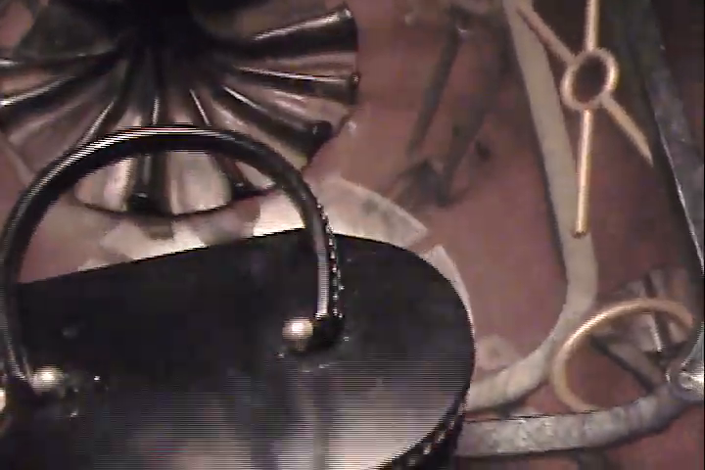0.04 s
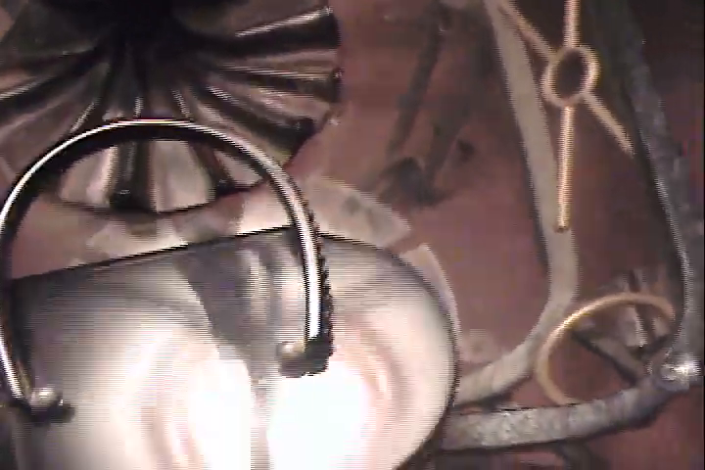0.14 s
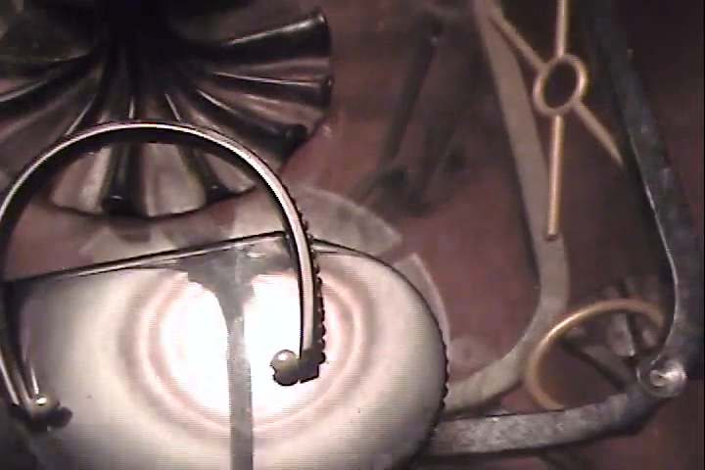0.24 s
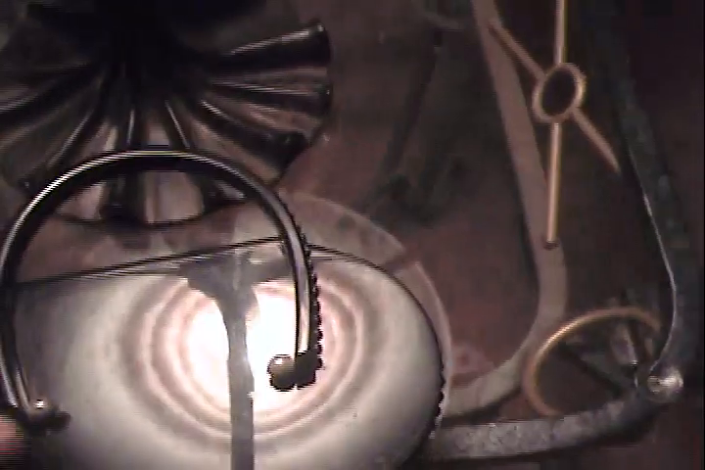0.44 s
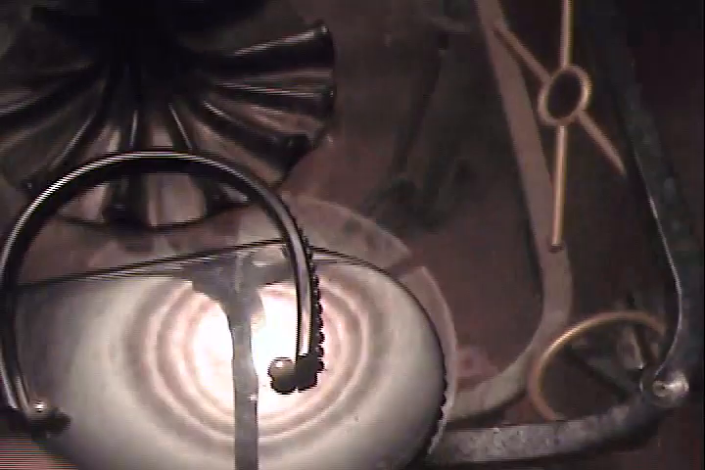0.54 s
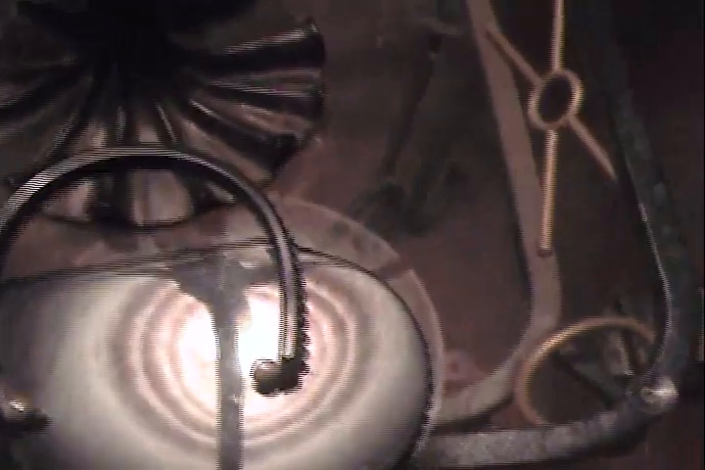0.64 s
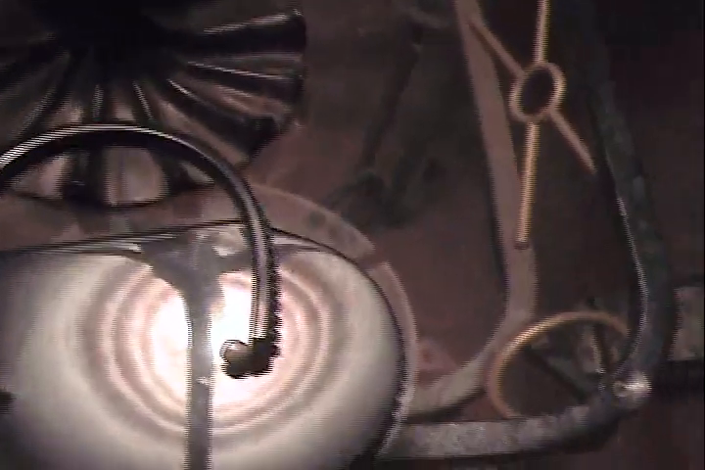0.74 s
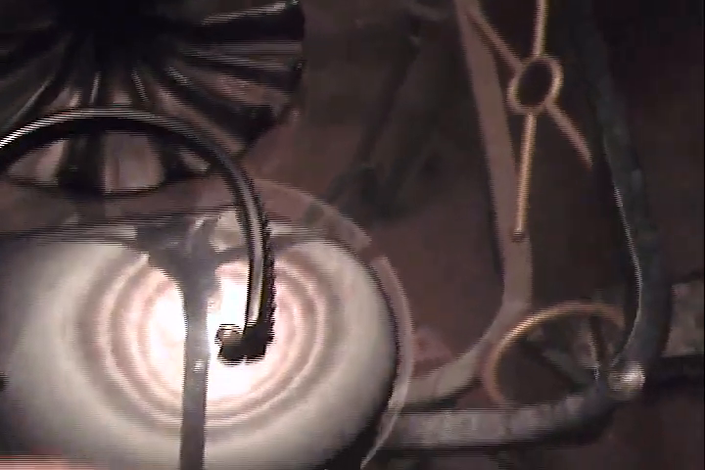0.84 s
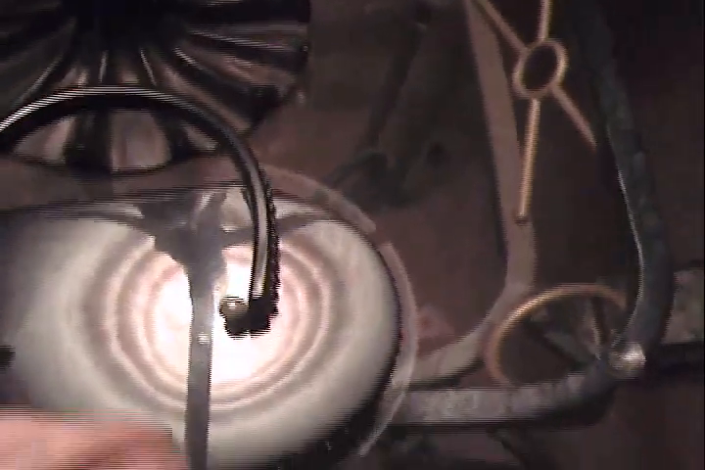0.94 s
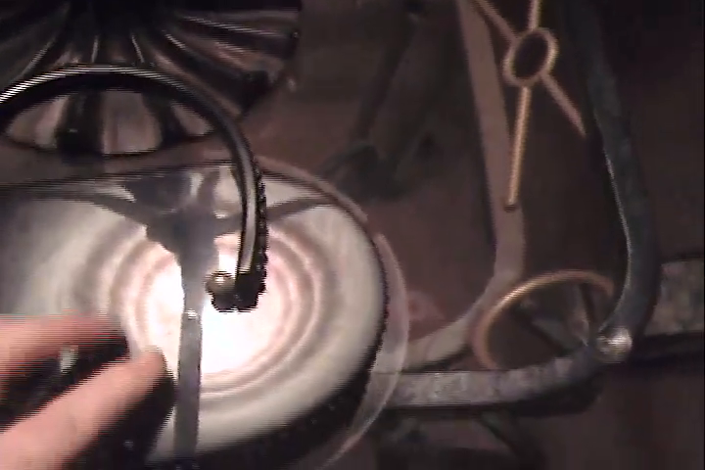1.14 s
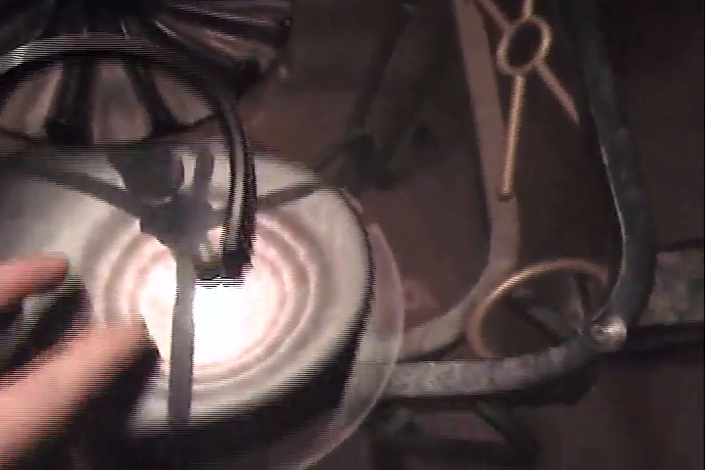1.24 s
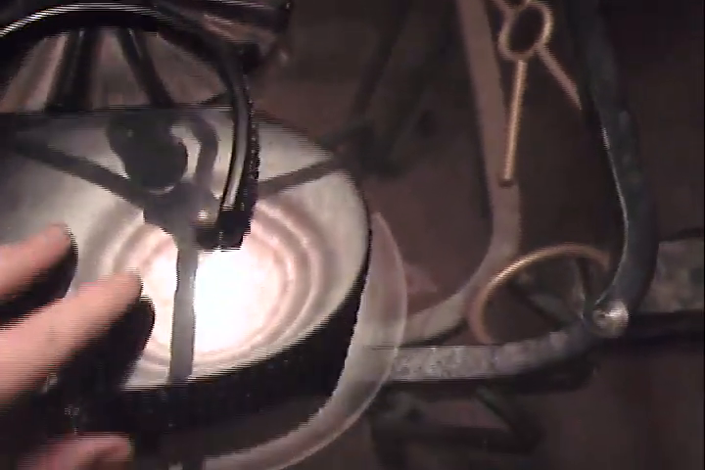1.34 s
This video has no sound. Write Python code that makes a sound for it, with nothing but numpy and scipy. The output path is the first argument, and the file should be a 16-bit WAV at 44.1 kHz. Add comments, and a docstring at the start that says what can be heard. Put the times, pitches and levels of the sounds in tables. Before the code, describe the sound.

A purse clasp snaps twice, then the hard case knocks on a table.

```python
"""In a small room, a hard-shelled purse is handled close to the microphone.
Its clasp snaps twice, the case knocks on the table, and fingers brush and tap it.
Each impact excites damped normal modes of the hollow case, and the hard ones ring the clasp too.
The room answers with a short reverberant tail and a low boom over a faint rumble."""
import sys
import numpy as np
from scipy import signal
from scipy.fft import rfft, irfft
from scipy.io import wavfile

SR = 44100
rng = np.random.default_rng(int(sys.argv[2]) if len(sys.argv) > 2 else 0)


def store_wav(level_fs):
    """Save 16-bit WAV to argv[1]."""
    pcm = np.round(np.clip(np.atleast_2d(level_fs), -1, 1) * 32767)
    wavfile.write(sys.argv[1], SR, pcm.T.astype(np.int16))


N = 61739


def from_db(db):
    """Amplitude ratio: a factor of ten for every 20 dB."""
    return 10 ** (np.asarray(db) / 20)


def at_hz(points, hz):
    """Interpolation on a logarithmic frequency axis."""
    frequencies, values = np.transpose(points)
    return np.interp(np.log(hz), np.log(frequencies), values)


def envelope(points):
    """Exponential growth and decay between (time_s, level_db) points; the end levels hold."""
    return from_db(np.interp(np.arange(N) / SR, *np.transpose(points)))


def impulses(times_s, levels_db):
    """Impulsive force: each impact lasts one sample."""
    force = np.zeros(N)
    np.add.at(force, (np.asarray(times_s) * SR).astype(int), from_db(levels_db))
    return force


def ring(force, modes, alternate=True):
    """Modal superposition: force convolved with damped sines, by default of alternating sign."""
    t = np.arange(N) / SR
    response = 0
    for k, (hz, db, t60) in enumerate(modes):
        sign = (-1) ** k if alternate else 1
        response += sign * from_db(db - 60 * t / t60) * np.sin(2 * np.pi * hz * t)
    return signal.fftconvolve(force, response)[:N]


def noise(spectrum, coherence, size=N, tilt_db=0):
    """Partially coherent stereo noise, of unit rms before a tilt per octave about 2 kHz."""
    hz = np.maximum(np.arange(size // 2 + 1) * SR / size, 1)
    gain = from_db(at_hz(spectrum, hz))
    gain /= np.sqrt(np.mean(gain ** 2))
    alike = at_hz(coherence, hz)
    octaves = np.log2(np.maximum(hz, 500) / 2000)
    mid, side = rfft(rng.standard_normal((2, size)))
    pair = np.sqrt((1 + alike) / 2) * mid + np.sqrt((1 - alike) / 2) * side * [[1], [-1]]
    return irfft(pair * gain * from_db(tilt_db * octaves), size)


def add(out, start_s, sound):
    """Linear superposition of a delayed sound."""
    i = int(start_s * SR)
    out[:, i:i + sound.shape[1]] += sound[:, :N - i]


# background spectrum: frequency_hz, density_db
RUMBLE_SPECTRUM = [(20, -7.5), (40, 0.5), (80, 2.5), (130, -9.5), (220, -9.5), (400, -17), (700, -20),
                   (1300, -30.5), (3000, -47.5), (6000, -42), (10500, -40), (12500, -76)]
# left-right likeness of rumble and brushing: frequency_hz, coherence
DIFFUSE_COHERENCE = [(30, 0.91), (200, 0.95), (1000, 0.77), (3000, 0.41), (5500, 0.22), (9000, 0.21)]
def room_rumble():
    """Ambient noise: a steady low rumble, most coherent at long wavelengths."""
    return from_db(-41) * noise(RUMBLE_SPECTRUM, DIFFUSE_COHERENCE)


# strength of the rubbing: time_s, level_db
BRUSH_LEVELS = [(0.70, -54.5), (0.77, -55), (0.82, -57.5), (0.95, -52), (1.03, -55.5), (1.17, -55.5),
                (1.24, -47), (1.31, -55), (1.39, -55)]
# friction spectrum: frequency_hz, density_db
BRUSH_SPECTRUM = [(300, -20), (1500, 3), (3500, 2.5), (6000, -3.5), (10000, -9), (12500, -28)]
def finger_brush():
    """Sliding friction: fingers on the shell make a faint hiss throughout, with late swells."""
    return envelope(BRUSH_LEVELS) * noise(BRUSH_SPECTRUM, DIFFUSE_COHERENCE)


# fingertips, or the case bouncing on the table: start_s, level_db, cutoff_hz
SOFT_TAPS = [(0.0790, -40, 900), (0.2551, -11, 1200), (0.2656, -21, 1100), (1.2456, -15.5, 322),
             (1.3767, -17.5, 1200)]
def soft_taps():
    """Compliant impact: a soft contact low-passes the case's ring, its crack and the room's tail."""
    out = np.zeros((2, N))
    for start_s, level_db, cutoff_hz in SOFT_TAPS:
        knock = case(impulses([start_s], [level_db])) * np.ones((2, 1))
        add(knock, start_s, from_db(level_db - 9) * crack())
        add(knock, start_s, from_db(level_db - 1.5) * room_tail())
        softness = signal.butter(2, cutoff_hz, fs=SR, output="sos")
        out += signal.sosfilt(softness, knock + 1e-18)
    return out


# modes of the hard shell: pitch_hz, level_db, t60_s
SHELL_MODES = [(1340, -9.5, 0.0072), (1611, -12.5, 0.041), (3260, -15, 0.028), (3670, -22.5, 0.042),
               (4370, -14, 0.022), (4870, -24, 0.019), (5260, -14.5, 0.014)]
# modes of the hollow, starting in phase: pitch_hz, level_db, t60_s
CAVITY_MODES = [(237.7, -12, 0.19), (277.6, -6.5, .09), (329.6, -23, 0.11), (448, -24, 0.17),
                (545, -25.5, 0.092), (880, -33.5, 0.034)]
def case(force):
    """Shell and cavity resonance: a clack and a thump; so small a radiator gives little bass."""
    low_cut = signal.butter(3, 218, "high", fs=SR, output="sos")
    thump = signal.sosfilt(low_cut, ring(force, CAVITY_MODES, alternate=False))
    return ring(force, SHELL_MODES) + thump


# spectrum of the impact transient: frequency_hz, density_db
CRACK_SPECTRUM = [(130, -41), (300, -10), (620, 8.5), (900, -9.5), (1350, 6.5), (2000, -0.5), (4000, 4),
                  (6000, -5), (10000, -2), (12000, -21), (16000, -28)]
# left-right likeness of an impact and its tail: frequency_hz, coherence
IMPACT_COHERENCE = [(30, 0.99), (200, 1), (1500, .98), (3000, 0.95), (5500, 0.68), (9000, 0.2)]
def crack(tilt_db=0, t60_s=0.0096, size=2048):
    """Impact transient: hard surfaces meet in a dense rattle that decays exponentially."""
    t = np.arange(size) / SR
    return noise(CRACK_SPECTRUM, IMPACT_COHERENCE, size, tilt_db) * from_db(-60 * t / t60_s)


# spectrum of the reverberant field: frequency_hz, density_db
TAIL_SPECTRUM = [(60, 4.5), (130, -2), (250, -0.5), (600, 2.5), (950, -2), (1400, 1), (2700, -5),
                 (4500, -9), (7000, -16), (10500, -23.5), (13000, -68)]
# reverberation time: frequency_hz, t60_s
REVERB_TIMES = [(60, 0.75), (250, 0.46), (600, 0.26), (1500, 0.2), (4000, 0.29), (10000, 0.25)]
def room_tail(tilt_db=0, build_cycles=1.56, size=32768):
    """Reverberation: each octave decays at its own rate, and the lows build up later than the highs."""
    t = np.arange(size) / SR
    hz = np.maximum(np.arange(size // 2 + 1) * SR / size, 1)
    spectrum = rfft(noise(TAIL_SPECTRUM, IMPACT_COHERENCE, size, tilt_db))
    out = 0
    for centre_hz in 31.25 * 2 ** np.arange(10):
        band = np.maximum(1 - abs(np.log2(hz / centre_hz)), 0)
        build = 1 - np.exp(-t * centre_hz / build_cycles)
        decay = from_db(-60 * t / at_hz(REVERB_TIMES, centre_hz))
        out += irfft(spectrum * band, size) * build * decay
    return out * from_db(-19)


# pulses of the rocking case: time_s, rms_db
ROCKING_LEVELS = [(0.235, -65), (0.26, -37), (0.29, -61), (0.325, -26), (0.355, -55), (0.40, -30),
                  (0.44, -56.5)]
def case_rocking(pitch_hz=61.9):
    """Amplitude modulation: a dull low tone pulses as the case rocks after the first snap."""
    return np.sqrt(2) * envelope(ROCKING_LEVELS) * np.sin(2 * np.pi * pitch_hz * np.arange(N) / SR)


# modes of the clasp: pitch_hz, level_db, t60_s
CLASP_MODES = [(580, -28, 0.028), (1320, -11, 0.023), (1560, -16, 0.013), (2010, -14, 0.018),
               (2200, -14, .018), (2537, -12.5, 0.02), (2727, -12.5, 0.032), (2930, -11.5, 0.019),
               (3238, -11.5, 0.033), (3857, -12.5, 0.022), (4150, -11, 0.013), (4840, -26, 0.027),
               (5800, -25.5, 0.0057), (6350, -17, 0.018), (7800, -19, 0.0027), (9770, -29, 0.02)]
def clasp(force):
    """Free vibration: the struck clasp rings in bright, quickly damped modes."""
    return ring(force, CLASP_MODES)


# resonances of the room: pitch_hz, level_db, t60_s
ROOM_MODES = [(255, -22, 0.19), (357.5, -37.5, 1.09), (438.4, -37, 0.46), (482, -50, 0.5),
              (556, -27.5, 0.19), (652, -27.5, .27), (1136, -39, 0.3), (1430, -29.5, 0.12),
              (1560, -44, 0.51), (1858, -38, 0.16), (2670, -43, 0.05)]
def room_resonance(times_s, levels_db, delay_s=0.0054):
    """Standing waves: the room's modes ring a moment after each hard contact."""
    return ring(impulses(times_s + delay_s, levels_db), ROOM_MODES)


# snaps and knocks: start_s, clasp_db, case_db, crack_db, tilt_db_per_octave, room_db
HARD_CONTACTS = [(0.2368, -25, -52, -28, -11, -30.5), (0.2390, 1.5, -6.5, -9, -2.5, -1.5),
                 (0.39, -17, -41, -20, 0.5, -15.5), (0.4067, -11, -25.5, -1, 0, -2.5),
                 (0.4086, -10, -20, -3.5, 2.5, -2.5), (0.4324, -25, -53, -17.5, -3.5, -13.5),
                 (0.777, -36, -34, -55, 3.5, -35), (1.0545, -39, -3.5, -12.5, -1.5, -15.5),
                 (1.276, -68, -34.5, -46, 3, -31), (1.3399, -38.5, -58.5, -37, 2, -35),
                 (1.355, -40, -51, -43, 3, -47), (1.3650, -43, -63, -42.5, 0.5, -42)]
def hard_contacts():
    """Impulse excitation: every hard contact cracks and sets clasp, case and room ringing."""
    times_s, clasp_db, case_db, _, _, rooms_db = np.transpose(HARD_CONTACTS)
    rings = clasp(impulses(times_s, clasp_db)) + case(impulses(times_s, case_db))
    rings += room_resonance(times_s, rooms_db)
    out = np.array([rings, rings])
    for start_s, _, _, crack_db, tilt_db, room_db in HARD_CONTACTS:
        add(out, start_s, from_db(crack_db) * crack(tilt_db))
        add(out, start_s, from_db(room_db) * room_tail(tilt_db))
    return out


# swells of the boom: time_s, rms_db
BOOM_LEVELS = [(0.24, -92), (0.29, -33.5), (0.40, -44.5), (0.45, -27.5), (0.49, -22.5), (0.525, -30.5),
               (0.56, -57), (0.605, -33), (0.665, -51.5), (0.715, -37), (0.78, -45.5), (0.85, -51),
               (1.05, -66.5), (1.12, -32.5), (1.20, -55), (1.30, -45.5), (1.40, -45)]
def room_boom(pitch_hz=214.6):
    """Room resonance: one low tone swells and dips after the snaps and knocks."""
    return np.sqrt(2) * envelope(BOOM_LEVELS) * np.sin(2 * np.pi * pitch_hz * np.arange(N) / SR)


def scene(pan_db=0.63):
    """Superposition: a level difference sets the purse slightly right; the low sounds stay centred."""
    purse = hard_contacts() + soft_taps() + finger_brush()
    pan = from_db([[-pan_db / 2], [pan_db / 2]])
    return purse * pan + case_rocking() + room_boom() + room_rumble()


def record(dry, cutoff_hz=12032):
    """Saturation and band limiting: the snaps overload the microphone, and the top is cut steeply."""
    saturated = dry / (1 + dry ** 4) ** 0.25
    low_pass = signal.ellip(8, 0.2, 70, cutoff_hz, fs=SR, output="sos")
    return signal.sosfilt(low_pass, saturated)


dry = scene()
out = record(dry)
store_wav(out)
```